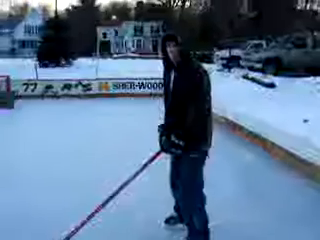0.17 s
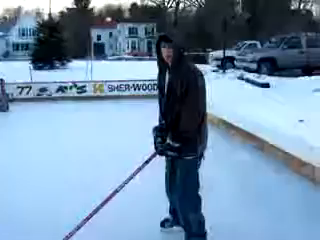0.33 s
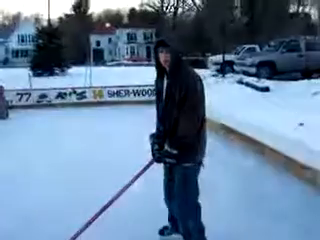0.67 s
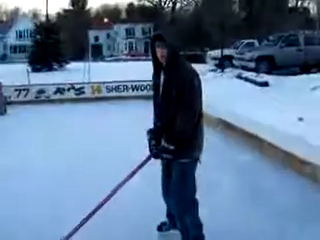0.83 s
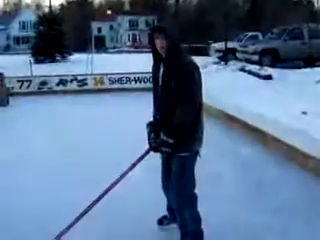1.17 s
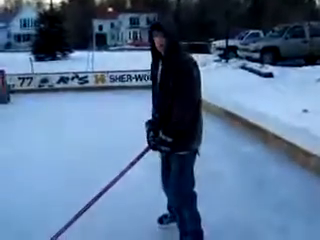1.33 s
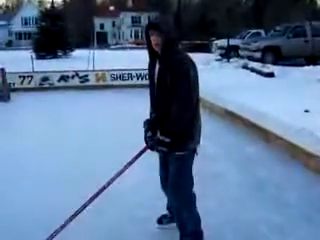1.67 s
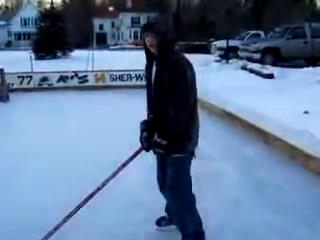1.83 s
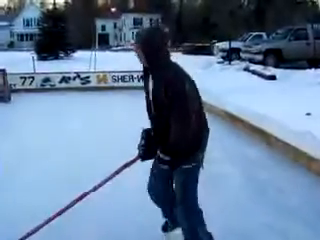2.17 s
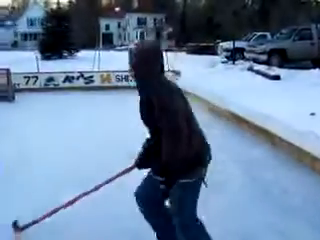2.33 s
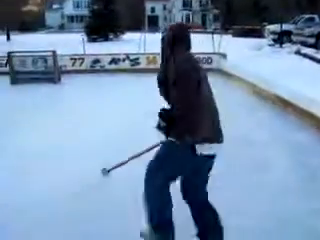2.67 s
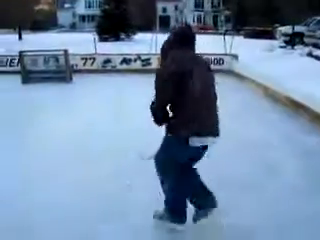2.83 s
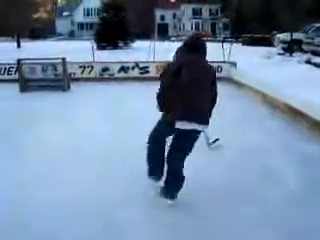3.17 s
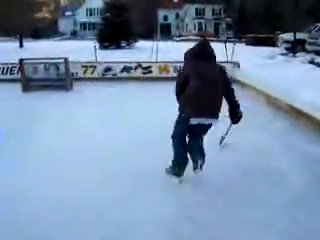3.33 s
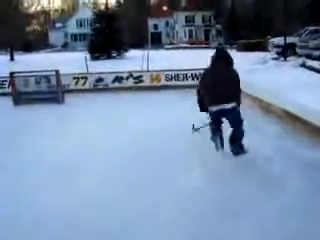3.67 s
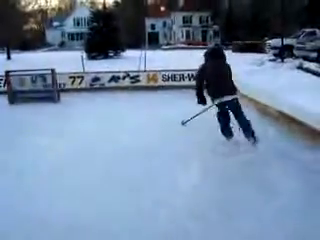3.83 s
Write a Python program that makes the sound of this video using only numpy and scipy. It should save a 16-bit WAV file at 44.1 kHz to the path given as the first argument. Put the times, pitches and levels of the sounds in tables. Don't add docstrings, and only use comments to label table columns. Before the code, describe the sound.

Skate blades on ice: near quiet, a long harsh scrape, then short sharp clacks and crunches

```python
import sys
import numpy as np
from scipy import signal
from scipy.fft import rfft, irfft
from scipy.io import wavfile
from scipy.ndimage import uniform_filter1d

SR = 44100
rng = np.random.default_rng(int(sys.argv[2]) if len(sys.argv) > 2 else 0)


def generate_wav(sig):
    pcm = np.round(np.clip(np.atleast_2d(sig).T, -1, 1) * 32767).astype(np.int16)
    wavfile.write(sys.argv[1], SR, pcm)


def magnitude_from_level(level_db):
    exponent = np.asarray(level_db, float) / 20
    return 10 ** exponent


N = 176400


def rms_one(x):
    return x / np.sqrt(np.mean(x ** 2) + 1e-20)


def in_time(rows):
    s, *columns = np.transpose(rows)
    return [np.interp(np.arange(N) / SR, s, c) for c in columns]


def drift(rate_hz):
    r = np.exp(-2 * np.pi * rate_hz / SR)
    noise = rng.standard_normal(N + SR)
    return rms_one(signal.lfilter([1], [1, -2 * r, r * r], noise)[SR:])


def resonate(x, peaks, patchy_db=0.):
    out = 0
    for k, (hz, width_hz, db) in enumerate(peaks):
        r = np.exp(-np.pi * width_hz / SR)
        b = [1, 0.02, -1.058]
        a = [1, -2 * r * np.cos(2 * np.pi * hz / SR), r * r]
        flicker = magnitude_from_level(patchy_db * drift(15.0)) if patchy_db else 1
        mode = rms_one(signal.lfilter(b, a, signal.lfilter(b, a, x)))
        out = out + (-1) ** k * magnitude_from_level(db) * flicker * mode
    return rms_one(out)


def grains(spread_db, clump_db):
    grains_per_s = 4000
    sizes = magnitude_from_level(spread_db * np.minimum(rng.exponential(1, N), 5)) * rng.choice([-1, 1], N)
    chips = sizes * (rng.random(N) < grains_per_s / SR) * magnitude_from_level(clump_db * drift(28))
    return rms_one(chips + 0.44 * rng.standard_normal(N))


# (frequency [Hz], density [dB per Hz])
AIR_SPECTRUM = [(24, -34.5), (45, -4.5), (200, -4.5), (420, -12.5), (900, -12), (1450, -19.5),
                (7400, -23.5), (10200, -24)]
# (frequency [Hz], rms level [dB])
CAMERA_WHINE = [(7511, -79), (7537, -85.5)]
# (time [s], level [dB])
WIND_RUMBLE = [
    (0, -64),
    (1.62, -65),
    (1.75, -52),
    (1.88, -61),
    (2.8, -63),
    (3.1, -52),
    (3.4, -57.5),
    (4, -54),
]


def background():
    hz = np.maximum(np.arange(N // 2 + 1) * SR / N, 20)
    air_hz, air_db = np.transpose(AIR_SPECTRUM)
    shape = magnitude_from_level(np.interp(np.log(hz), np.log(air_hz), air_db))
    air = magnitude_from_level(-59.5) * rms_one(irfft(rfft(rng.standard_normal(N)) * shape, N))
    t = np.arange(N) / SR
    whine = sum(np.sqrt(2) * magnitude_from_level(db) * np.sin(2 * np.pi * f * t) for f, db in CAMERA_WHINE)
    low_band = signal.butter(2, [18, 66], "band", fs=SR, output="sos")
    wind = rms_one(signal.sosfilt(low_band, rng.standard_normal(N)))
    gusts_db = in_time(WIND_RUMBLE)[0] - 3.0 + drift(5.2)
    return air + whine + magnitude_from_level(gusts_db) * wind


def strike(times, levels_db, modes, pitch_spread):
    rise_s = 0.00047
    out, t = np.zeros(N), np.arange(SR // 10) / SR
    hz, mode_db, t60 = np.transpose(modes)[:, :, None]
    luck_of_all = rng.standard_normal((len(times), 3, len(modes), 1))
    for s, db, luck in zip(times, levels_db, luck_of_all):
        decay = magnitude_from_level(db + mode_db + 2 * luck[0] - 60 * t / t60)
        pitch = hz * np.exp(pitch_spread * luck[1])
        rings = decay * np.sin(2 * np.pi * pitch * t + 3.95 + 0.49 * luck[2])
        knock = rings.sum(axis=0) * (1 - np.exp(-t / rise_s))
        at = int((s + .0007) * SR)
        out[at:at + len(t)] += knock[:N - at]
    return out


# (time [s], peak [dB], thud [dB],
# crack [dB])
SKATER_KNOCKS = [(0.704, -31.5, -28.5, -26), (0.71, -45, -9.5, -14), (1.904, -36.5, -14, -18),
                 (1.962, -37, -15, -32), (2.01, -30, -13.5, -18), (2.02, -37, -17, -25),
                 (2.213, -35, -31, -22), (2.275, -43, 1, -17), (2.747, -35, -5.5, -36),
                 (2.752, -12, -20.5, -22.5), (2.762, -20, -33, -46), (2.769, -22.5, -8.5, -19),
                 (2.778, -25, -33, -33), (2.804, -38, -17, -21), (2.819, -42, -13, -14),
                 (2.838, -45.5, -7, -16), (2.874, -40.5, -2, -35), (2.8772, -12, -15, -14),
                 (2.937, -35.5, -9.5, -12.5), (2.995, -24, -20, -22.5), (3.005, -40, -17, -33),
                 (3.019, -32, -14, -15), (3.085, -23, -6.5, -6.5), (3.111, -26.5, -11.5, -20),
                 (3.167, -26, -22, -18), (3.177, -18, -17.5, -21), (3.186, -25, -47, -26),
                 (3.214, -12.5, -22, -20.5), (3.223, -21, -26, -26), (3.236, -23, -13.5, -29),
                 (3.246, -23, -18.5, -24), (3.26, -23.5, -22, -22.5), (3.373, -19, -9, -11.5),
                 (3.405, -27, -44, -10), (3.416, -20.5, -25.5, -16), (3.481, -14, -25, -21),
                 (3.507, -22.5, -16, -20), (3.517, -25, -25, -24), (3.539, -13, -19.5, -22),
                 (3.551, -19, -17.5, -18), (3.605, -26, -58, -39), (3.686, -28.5, -20, -19),
                 (3.716, -27.5, -23, -21), (3.732, -14.5, -22, -19.5), (3.74, -16, -30, -23.5),
                 (3.763, -23, -17, -18), (3.768, -27, -14, -18), (3.791, -22.5, -22, -22),
                 (3.796, -24, -19, -22), (3.812, -23.5, -16, -26), (3.847, -38, -28, -13),
                 (3.867, -34.5, -10, -8), (3.889, -37, -8, -7), (3.923, -24, -18, -17.5)]
# (time [s], level [dB])
ICE_TICKS = [
    (0.763, -55),
    (1.122, -54),
    (2.585, -30.5),
    (2.745, -54),
    (2.782, -54),
    (2.84, -67),
    (3.296, -45),
    (3.89, -61),
]
# (frequency [Hz], level [dB], T60 [s])
STICK_MODES = [(1260, 2.5, 0.012), (1500, -9, 0.01), (1700, -5, 0.0074), (2140, -3.5, 0.011),
               (860, -7.5, .008), (550, -5, 0.007)]
# (frequency [Hz], level [dB], T60 [s])
KNOCK_MODES = [(440, -13, 0.0055), (590, -11, 0.0081), (826, -3.5, 0.014), (1000, 2.5, 0.011),
               (1333, -9.5, 0.016), (1700, -1.5, 0.0064), (2250, -6.5, 0.004), (2880, -11, 0.0064)]
# (frequency [Hz], level [dB], T60 [s])
THUD_MODES = [(165, 2, 0.033), (261, 5.5, 0.038), (344, 2, 0.028), (483, 0.5, 0.015)]
# (frequency [Hz], width [Hz], level [dB])
SPRAY_HISS = [(4120, 4150, 4), (6150, 550, 2.5), (6770, 2500, 4.5), (10100, 10000, -1.5)]
# (frequency [Hz], width [Hz], level [dB])
HIGH_HISS = [(6910, 1400, 0.022), (8350, 1800, -1.5)]


def knocks():
    stick_taps, pitch_spread = 3, 0.092
    crack_db, crack_s = 3, 0.00089
    s, db, thud_db, split_db = np.transpose(SKATER_KNOCKS)
    tick_s, tick_db = np.transpose(ICE_TICKS)

    clicks, fade = np.full((2, N), 1e-18), np.exp(-1 / (crack_s * SR))
    clicks[0, ((s + .0006) * SR).astype(int)] = magnitude_from_level(db + split_db + crack_db)
    clicks[1, (tick_s * SR).astype(int)] = magnitude_from_level(tick_db)
    crack, tick = signal.lfilter([np.e * (1 - fade)], [1, -2 * fade, fade ** 2], clicks)
    noise = rng.standard_normal(N)
    splitting = crack * resonate(noise, SPRAY_HISS, 2)
    ticking = tick * resonate(noise, HIGH_HISS, 4.4)

    stick = strike(s[:stick_taps], db[:stick_taps], STICK_MODES, 0.041)
    blade = strike(s[stick_taps:], db[stick_taps:] - 3.0, KNOCK_MODES, pitch_spread)
    thud = strike(s, db + thud_db, THUD_MODES, pitch_spread)
    return stick + blade + thud + splitting + ticking


def gliding(x, hz):
    centres = np.geomspace(850, 1400, num=6)
    place = np.interp(np.log(hz), np.log(centres), np.arange(6))
    out = 0
    for k, centre in enumerate(centres):
        share = np.sqrt(np.clip(1 - abs(place - k), 0, 1))
        out = out + share * resonate(np.roll(x, 999 * k), [(centre, 460, 0)])
    return out


# (time [s], level [dB], sheet thud [dB], mid hiss [dB], top hiss [dB])
TURN_LEVELS = [(1.95, -66, 12.5, -11, -10), (2.04, -52, -14, -6, -9.5), (2.085, -43.5, -14, -10.5, -18),
               (2.106, -53, -2.5, -2.5, -4.5), (2.175, -47.5, -13, -2, -10.5), (2.2, -50.5, -4, 3, -4),
               (2.214, -37.5, -17, -11, -19), (2.234, -43.5, -15, -7, -2), (2.25, -31.5, -17, -5.5, -2),
               (2.295, -35, -16, -5.5, -6), (2.34, -30.5, -18, -5, -2), (2.4, -28, -12.5, -3.5, -6),
               (2.47, -27.5, -15, -5, -7.5), (2.492, -39.5, 3, -6, 0), (2.58, -36, 0, -7.5, -1),
               (2.61, -39, -2, -10.5, -13), (2.635, -45.5, -5.5, -7, -17), (2.74, -60.5, -6, -11, -9)]
# (time [s], frequency [Hz], ring level [dB], finest spray [dB], blade [dB])
TURN_RING = [
    (2.0, 1040, -4.5, -26, -2.5),
    (2.2, 1110, -3, -10.5, -4),
    (2.27, 1125, -7.5, -9.5, -0.5),
    (2.33, 1240, -10, -4.5, -1.5),
    (2.4, 1096, -6, -13.5, -1.5),
    (2.47, 1020, -1.5, -17, -2),
    (2.52, 1030, 1.5, -25, -2.5),
    (2.62, 923, -5.5, -19, -4),
    (2.74, 1000, -0.5, -26, -2),
]
# (frequency [Hz], width [Hz], level [dB])
BLADE_BODY = [(1584, 380, 4.5), (2060, 510, -1.5), (2640, 970, -5)]
# (frequency [Hz], width [Hz], level [dB])
ICE_SHEET = [(179, 193, -2), (258.3, 112, 1), (344, 130, -7.5)]
# (frequency [Hz], width [Hz], level [dB])
SHAVING_HISS = [(3615, 340, -0.19), (4160, 890, -0.51), (4980, 910, 0.56)]
# (frequency [Hz], width [Hz], level [dB])
FINEST_SPRAY = [(9300, 2600, 0)]


def turn():
    patchy_db = 1.3
    db, thud_db, mid_db, top_db = in_time(TURN_LEVELS)
    hz, ring_db, fine_db, blade_db = in_time(TURN_RING)
    chips = grains(spread_db=3, clump_db=.9)
    blade = magnitude_from_level(blade_db) * resonate(chips, BLADE_BODY, patchy_db)
    ring = magnitude_from_level(ring_db + 1.5 * drift(20.5)) * gliding(chips, hz)
    sheet = magnitude_from_level(thud_db) * resonate(chips, ICE_SHEET + [(564, 270, -6.0)], 1.2)
    mid = magnitude_from_level(mid_db + 0.55 * drift(21)) * resonate(np.roll(chips, 20), SHAVING_HISS, patchy_db)
    top = magnitude_from_level(top_db + 0.58 * drift(27)) * resonate(np.roll(chips, 40), HIGH_HISS, patchy_db)
    spray = magnitude_from_level(fine_db) * resonate(chips[::-1], FINEST_SPRAY, 2.2)
    t = np.arange(N) / SR
    in_contact = (t > TURN_LEVELS[0][0]) * (t < TURN_LEVELS[-1][0])
    return magnitude_from_level(db) * (blade + ring + sheet + mid + top + spray) * in_contact


# (start [s], length [s], level [dB], thud [dB], hiss [dB])
STRIDE_STROKES = [(2.747, 0.11, -52.5, -5.5, -11.5), (2.876, 0.013, -29, -9.5, -5.5),
                  (2.883, 0.09, -47.5, -3.5, -9), (3.019, 0.046, -43, -5, -5.5),
                  (3.058, 0.034, -40, -31, -3.5), (3.069, 0.1, -50.5, -5, -14),
                  (3.245, 0.049, -41.5, -6.5, -5), (3.32, 0.11, -44.5, -21, -12.5),
                  (3.385, 0.0089, -40, 3, 9), (3.393, 0.096, -52.5, 4, -9), (3.515, 0.054, -34, -6.5, -8),
                  (3.596, 0.053, -41, -12, -4), (3.613, 0.0072, -37.5, -6.5, 9.5),
                  (3.616, 0.11, -47.5, -4, -8.5), (3.743, 0.15, -44.5, -7.5, -6),
                  (3.821, 0.078, -42.5, -6.5, -15.5), (3.943, 0.06, -50, -13, -14)]
# (frequency [Hz], width [Hz], level [dB])
CRUNCH_RING = [(557, 520, -1.5), (982, 370, 0.5), (1370, 1480, -1.5), (1963, 980, -1.5), (3030, 590, -8),
               (3730, 1000, -22.5)]


def strokes():
    rise, fall = 0.57, 0.34
    t, ring, thud, hiss = np.arange(N) / SR, 0, 0, 0
    for s, length, db, thud_db, hiss_db in STRIDE_STROKES:
        swell = np.clip((t - s) / (rise * length), 0, 1)
        release = np.exp(-np.clip(t - s - length, 0, 1) / (fall * length))
        shape = magnitude_from_level(db) * swell * release
        ring = ring + shape
        thud = thud + shape * magnitude_from_level(thud_db)
        hiss = hiss + shape * magnitude_from_level(hiss_db)
    crunch = grains(spread_db=4, clump_db=2.2)
    spray = rms_one(grains(spread_db=2.5, clump_db=1.5) + .4 * crunch)
    ringing = ring * resonate(crunch, CRUNCH_RING, 2.6)
    thudding = thud * resonate(crunch, ICE_SHEET, 1.1)
    return ringing + thudding + hiss * resonate(spray, SPRAY_HISS, 1.3)


# (delay [s], level [dB])
BOARD_REFLECTIONS = [
    (0.02, -28),
    (0.046, -27),
]


def scene():
    no_rumble = signal.butter(2, 125., "high", fs=SR, output="sos")
    skater = signal.sosfilt(no_rumble, knocks() + turn() + strokes())
    dull = signal.lfilter([.4], [1, -.6], skater)
    echoes = sum(magnitude_from_level(db) * np.roll(dull, int(s * SR)) for s, db in BOARD_REFLECTIONS)
    return (background() + skater + echoes)[None]


def gated_treble(x):
    edge_hz, edge_db_per_khz2 = 9650, 48
    gate_db, gate_from_hz, heard_db = -15.5, 3500, -109
    hz, _, z = signal.stft(x, SR, nperseg=512)
    above_khz = np.clip(hz - edge_hz, 0, 3000)[:, None] / 1000
    z = z * magnitude_from_level(-edge_db_per_khz2 * above_khz ** 2)
    power = abs(z) ** 2
    band = uniform_filter1d(power, size=15, axis=1)
    before = np.maximum(np.roll(band, 1, axis=2), np.roll(band, 2, axis=2))
    strong_enough = band > before * magnitude_from_level(gate_db) ** 2
    audible = uniform_filter1d(power, size=3, axis=1) > magnitude_from_level(heard_db) ** 2
    keep = (strong_enough & audible) | (hz[:, None] < gate_from_hz)
    return signal.istft(z * keep, SR, nperseg=512)[1][:, :N]


def band_limit(x):
    return signal.sosfilt(signal.butter(12, 12470, fs=SR, output="sos"), x)


def record(dry):
    start_s, fade_s = .128, 0.00091
    x = dry * np.clip((np.arange(N) / SR - start_s) / fade_s, 0, 1)
    shoulder = signal.butter(2, 9070, fs=SR, output="sos")
    x = gated_treble(signal.sosfilt(shoulder, x))
    image_band = signal.butter(3, [11300, 12200], "band", fs=SR, output="sos")
    image = signal.sosfilt(image_band, x * (-1.) ** np.arange(N))
    return band_limit(x + magnitude_from_level(-18.5) * image)


dry = scene()
out = record(dry)
generate_wav(out)
```